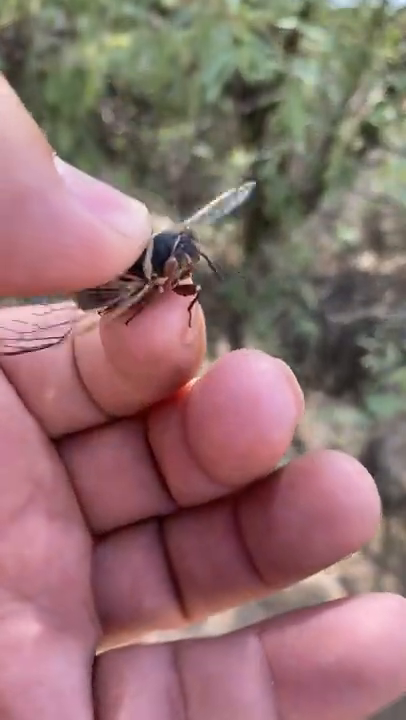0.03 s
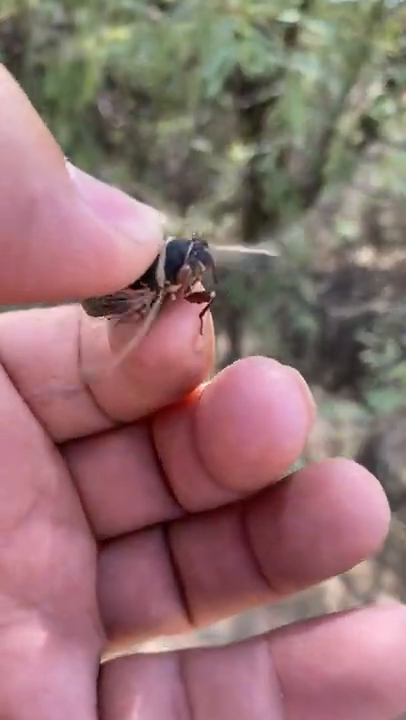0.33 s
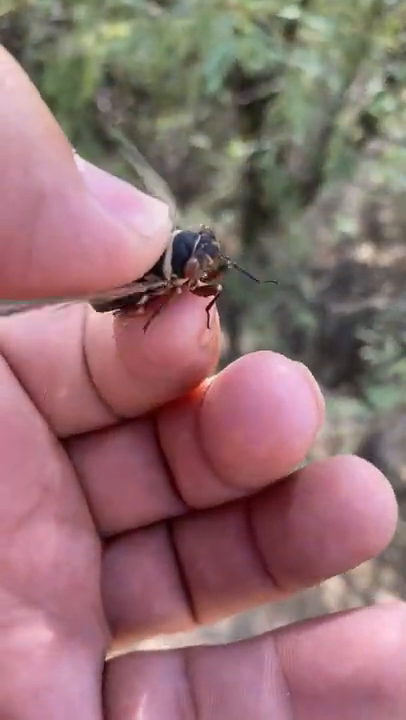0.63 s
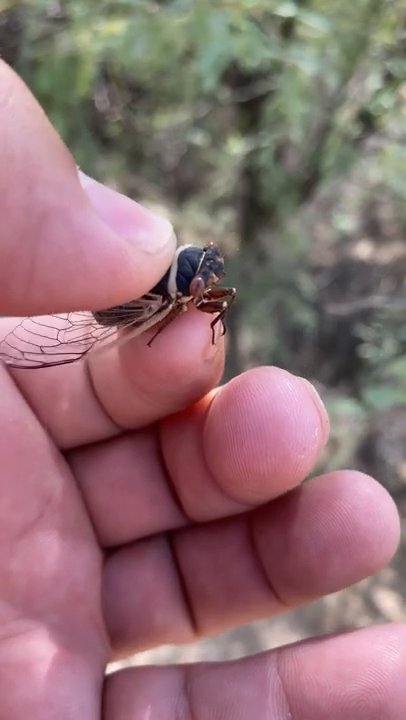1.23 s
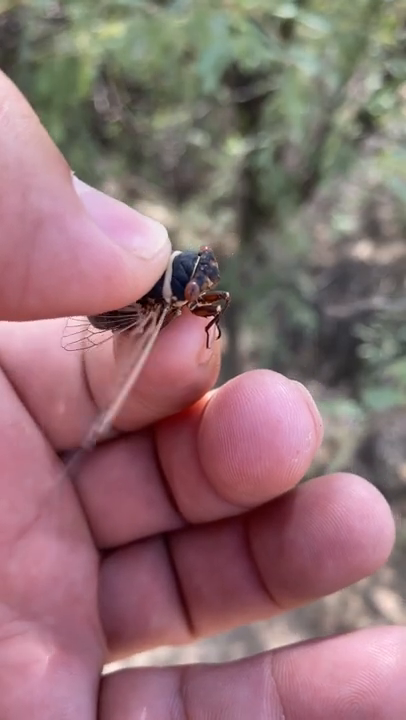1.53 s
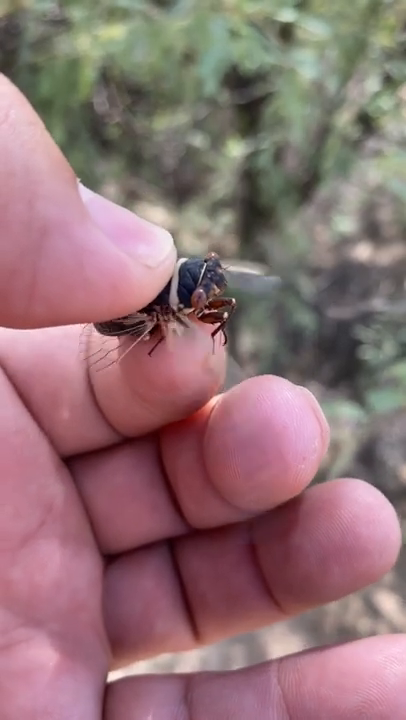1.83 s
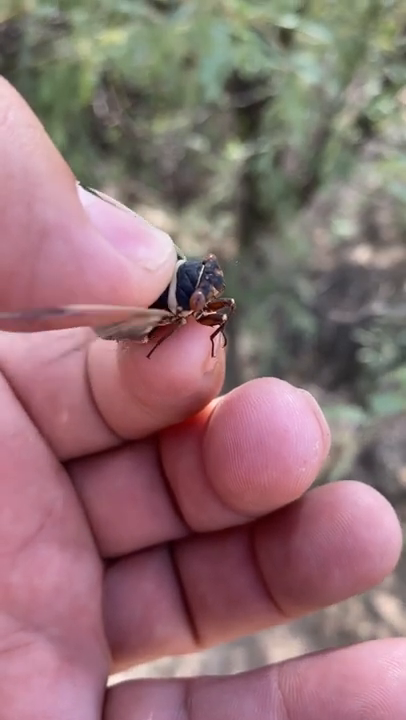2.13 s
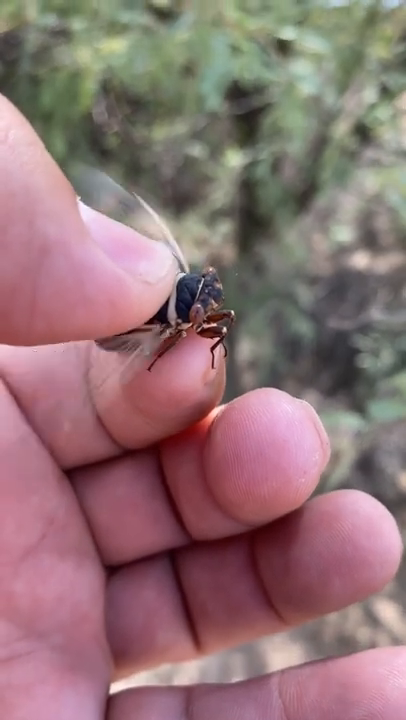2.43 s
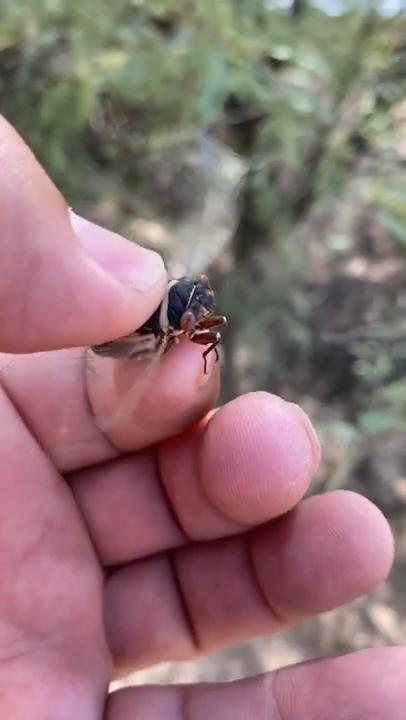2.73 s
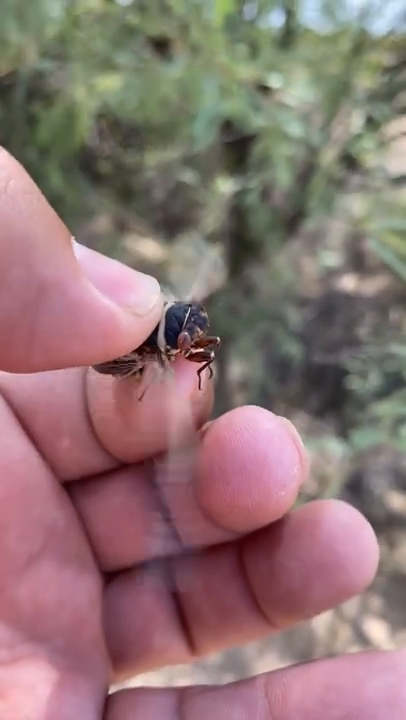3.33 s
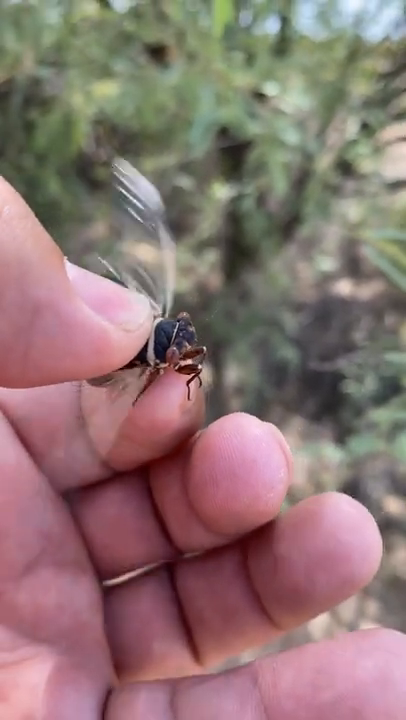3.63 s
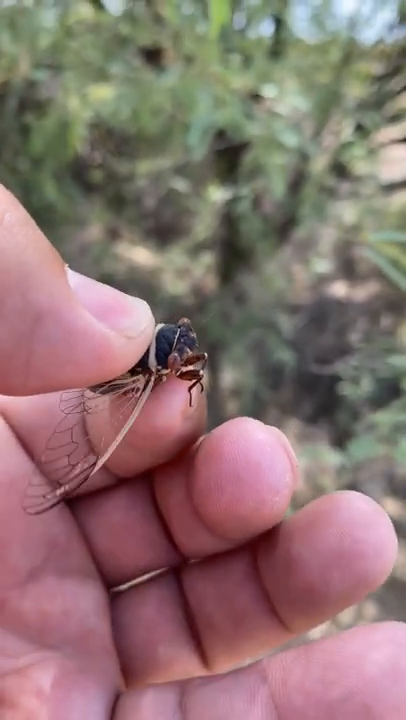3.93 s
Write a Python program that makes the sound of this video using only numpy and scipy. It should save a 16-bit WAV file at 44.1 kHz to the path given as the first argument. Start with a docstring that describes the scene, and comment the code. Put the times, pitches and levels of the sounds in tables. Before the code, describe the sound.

A cicada held between fingers gives short, raspy squawks and flutters its wings in repeated fits close to the microphone. Behind it, outdoors, another cicada sings steadily over a shrill distant chorus and a faint low rumble.

```python
"""A cicada, held between finger and thumb close to the microphone, struggles in short fits.
Its wings thrum the air, slap and brush the fingers, and now and then give a lone twitch.
Its tymbals squawk: their ribs buckle in quick trains of clicks that ring the abdomen.
Behind it a second cicada sings steadily in a bush, over a shrill far chorus and a low outdoor rumble."""
import sys
import numpy as np
from scipy import signal
from scipy.fft import rfft, irfft, next_fast_len
from scipy.io import wavfile

SR = 44100
rng = np.random.default_rng(int(sys.argv[2]) if len(sys.argv) > 2 else 0)


def transcribe(u):
    """Save the signal u as a 16-bit wav file named by the first command-line argument.

    u: samples, shape (n,) or (channels, n), limited to [-1, 1]; the rate is SR.
    q: integer samples, one column per channel.
    """
    v = np.clip(np.atleast_2d(u).T, -1, 1)
    q = np.round(v * 32767).astype(np.int16)
    wavfile.write(sys.argv[1], SR, q)


N = 176400

# Table levels are relative; each layer's rms level is set where it enters stereo().
# Shrill hiss of the far chorus (frequency [Hz], level [dB])
CHORUS_EQ = [(2000, -51), (3300, -25.5), (4600, -24), (5300, -29.5), (6200, -11), (7000, -12.5), (8600, -8),
             (9300, -4), (9700, 0.5), (10500, -2), (11400, -3), (12500, -12.5), (13800, -15), (15000, -29),
             (16000, -22.5)]
# Low outdoor bed (frequency [Hz], level [dB])
RUMBLE_EQ = [(15, -45), (35, -5.5), (55, 6), (90, -2), (135, 2), (180, -5), (260, -5), (350, -3),
             (500, -10), (700, -10), (1000, -15), (1700, -23.5), (2200, -21), (3300, -44), (8000, -51)]
# Pace of the neighbour's tymbals (time [s], rate [cycles/s])
SONG_PACE = [(0, 160.0), (1, 159.8), (2.4, 160.0), (3.1, 159.7), (3.5, 159.0), (4, 159.6)]
# Tone of the neighbour's song (frequency [Hz], level [dB])
SONG_EQ = [(3000, -64), (5300, -30.5), (7000, -15), (8700, -10.5), (9300, 0), (9650, 1), (10400, -2.5),
           (11400, -5), (12500, -9), (14000, -26), (16000, -24)]
# Fits of flapping (start [s], length [s], rate [beats/s], air level [dB], slap level [dB])
WING_FITS = [(.004, .072, 48, 4.5, -12), (0.136, .165, 51.4, 2, -11.5), (0.457, .165, 45, 1, -0.5),
             (0.761, .12, 49.7, 2.5, -1), (1.079, .145, 41, 0.5, -3.5), (1.405, .125, 41.7, -1, -0.5),
             (1.79, .1, 44.4, 2, 3), (2.101, .145, 43, 0.5, -0.5), (2.466, .075, 44.6, -2, -4.5),
             (2.607, .075, 46, -1, -1.5), (2.744, .078, 45.7, 0.5, -2.5), (3.087, .168, 43, -1.5, -1.5),
             (3.345, .08, 43.3, 0.5, -1.5), (3.649, .165, 47.4, -1, -1.5)]
# Thrum of air pushed by the wings (frequency [Hz], level [dB])
AIR_EQ = [(20, -46), (48, 1), (65, 1), (95, -0.5), (150, -9), (250, -7), (350, -14.5), (480, -22),
          (900, -27.5), (2000, -32), (5000, -83)]
# Snap of a wing on a finger (frequency [Hz], level [dB])
SLAP_EQ = [(300, -26), (900, -13), (1700, -14.5), (2100, -6.5), (2400, 3), (2750, -2.5), (3300, -22.5),
           (4500, -8.5), (7000, -9.5), (10000, -8.5), (13000, -4.5), (16000, -10)]
# Wing membranes brushing skin (frequency [Hz], level [dB])
RUSTLE_EQ = [(400, -11), (1500, -11.5), (2450, 4.5), (3200, -4.5), (4500, -1), (10000, -7), (13000, 0),
             (16000, -1.5)]
# Squawks of the held cicada (start [s], length [s], tymbal rate [cycles/s], level [dB])
SQUAWK_CUES = [(0.192, 0.058, 156, -0.5), (.4753, .003, 150, -5), (.4873, 0.044, 150, 0.5),
               (0.537, .003, 150, -6), (0.5568, 0.053, 159, 2), (0.809, 0.045, 151, 1.5),
               (1.0817, 0.0027, 140, 0.5), (1.1017, 0.045, 151, 2.5), (1.4385, 0.077, 144, 1.5),
               (1.893, 0.0032, 260, 0.5), (2.136, .003, 120, -0.5), (2.1475, 0.054, 151, -.5),
               (2.526, .01, 150, -0.5), (2.645, .028, 150, -1), (3.116, 0.039, 144, 1.5),
               (3.17, 0.023, 139, 1), (3.751, .03, 134, 2.5), (3.8142, 0.01, 197, 1),
               (3.9975, .003, 180, 0.5)]
# Ribs that buckle in each tymbal cycle (offset from the main click [s], level [dB])
TYMBAL_RIBS = [(-.0026, -2), (-.0008, -7.5), (0., -1.5)]
# Ring of the abdomen (frequency [Hz], level [dB])
ABDOMEN_EQ = [(1500, -54), (3000, -29), (3500, -26), (4000, -16), (4600, -10.5), (5300, -10.5),
              (6400, -5.5), (7200, 1.5), (7800, -9), (8400, -6.5), (9000, -12.5), (9600, -9.5),
              (10800, -18), (13000, -7), (14300, -12.5), (15700, -22.5)]
# Lone twitches of the wings (time [s], level [dB])
TWITCH_CUES = [(.38, -3.5), (.68, -3.5), (.985, -3), (1.58, -14.5), (2.332, -13.5), (2.391, -4.5),
               (3.975, -8.5)]
# Phase between the two microphone ports (frequency [Hz], left lead [rad])
STEREO_PHASE = [(20, 0), (380, 0.43), (680, 2), (1400, 0.65), (2000, 1.06), (2500, 2.2), (3700, 0.71),
                (5500, 1), (7000, 3), (8000, 3), (9900, 6), (11300, 6.5), (12800, 9), (14800, 9.5),
                (15600, 13.5)]
# Balance between the ports (frequency [Hz], left minus right [dB])
STEREO_BALANCE = [(80, -.5), (420, -5), (950, 3.5), (1600, 4), (2250, -4), (3000, 0), (4500, -3.5),
                  (5600, 0), (6500, 0.5), (16000, 0)]
# How alike the ports sound (frequency [Hz], likeness [0-1])
STEREO_LIKENESS = [(60, 1), (300, .96), (600, 0.82), (1700, .65), (2700, 0.86), (5500, 0.71), (7200, 1),
                   (8800, 0.71), (10300, 1), (11800, .75), (13300, 1), (16000, 0.72)]

TOP_HZ = 15880


def amp(db):
    """Decibels to gain."""
    return 10 ** (np.asarray(db) / 20)


def unit(x):
    """Scales to rms 1."""
    return x / np.sqrt(np.mean(x ** 2) + 1e-20)


def curve(points, hz):
    """Reads a table on a log-frequency axis."""
    f, value = np.transpose(points)
    return np.interp(np.log(hz + 1), np.log(f + 1), value)


def clicks(times, db):
    """Sharp impulses at exact times, even between samples."""
    out, at = np.zeros(N), np.asarray(times)[:, None] * SR
    near = np.floor(at).astype(int) + np.arange(-8, 9)
    shape = np.sinc(near - at) * np.cos(np.pi * (near - at) / 18) ** 2
    inside = (near >= 0) & (near < N)
    np.add.at(out, near[inside], (shape * amp(db)[:, None])[inside])
    return out


def colour(x, eq, size=8192):
    """Minimum-phase EQ: the ring follows the hit."""
    log_gain = np.log(amp(curve(eq, abs(np.fft.fftfreq(size, 1 / SR)))))
    ring = np.fft.ifft(np.exp(np.conj(signal.hilbert(log_gain)))).real[:size // 2]
    return signal.oaconvolve(x, ring[None], axes=1)[:, :N]


def smear(x, lag_s):
    """Highs arrive ahead of lows, so a click becomes a tiny chirp."""
    hz = np.fft.rfftfreq(2 * N, 1 / SR)
    delay = lag_s * (.5 - hz / TOP_HZ)
    return irfft(rfft(x, 2 * N) * np.exp(-2j * np.pi * np.cumsum(delay) * hz[1]))[:N]


def linger(hits, decay_s):
    """Envelope that spreads each hit's energy over a decay."""
    pole = np.exp(-2 / (decay_s * SR))
    return np.sqrt(signal.lfilter([1 - pole], [1, -pole], hits ** 2 + 1e-20))


def noise():
    """Two unrelated rows of white noise."""
    return rng.standard_normal((2, N))


def spray(hits, decay_s):
    """Two unrelated puffs of noise after each hit, with the hit's energy."""
    return linger(hits, decay_s) * noise()


def scattered(hits, share, decay_s):
    """Mid: the hits with a noisy tail. Side: tail alone."""
    mid, side = spray(hits, decay_s)
    return np.array([unit(hits + share * mid), unit(side)])


def stereo(pair, eq, db):
    """Colours a mid/side pair and spreads it over the two microphone ports at an rms level."""
    size = next_fast_len(N + 4096)
    hz = np.fft.rfftfreq(size, 1 / SR)
    mid, side = rfft(colour(pair, eq), size)
    likeness = np.clip(curve(STEREO_LIKENESS, hz), 0, .995)
    mid, side = mid * np.sqrt(1 + likeness), side * np.sqrt(1 - likeness)
    pan = amp(curve(STEREO_BALANCE, hz) / 2)
    left = (mid + side) * pan
    right = (mid - side) / pan * np.exp(-1j * curve(STEREO_PHASE, hz))
    return amp(db) * unit(irfft(np.array([left, right]), size)[:, :N])


def waver(depth_db, count=24):
    """A slow random ride on the fader."""
    hz, t = np.geomspace(.5, 14, count)[:, None], np.linspace(0, N / SR, count * count)
    wobbles = np.sin(2 * np.pi * (hz * t + rng.random((count, 1)))) / hz ** 0.24
    return amp(depth_db * np.interp(np.arange(N) / SR, t, unit(wobbles.sum(0))))


def far_chorus():
    """Distant cicadas merge into one shrill, shimmering hiss."""
    return stereo(noise(), CHORUS_EQ, db=-38) * waver(depth_db=0.9)


def outdoor_rumble():
    """A low bed of noise that swells and sinks."""
    return stereo(noise(), RUMBLE_EQ, db=-45) * waver(depth_db=2.4)


def neighbour_song(jitter_s=.00002, spread_db=1.36, gap_s=.00205, echo_s=.008, echo_mix=0.28):
    """A steady train of double tymbal clicks, with echoes from the ground and twigs."""
    t = np.arange(N) / SR
    cycles = np.cumsum(np.interp(t, *np.transpose(SONG_PACE))) / SR
    beats = np.interp(np.arange(1, cycles[-1]), cycles, t)
    late, late2, loud, loud2 = rng.standard_normal((len(beats), 4)).T
    song = clicks(beats + jitter_s * late, spread_db * loud)
    song += clicks(beats + gap_s + jitter_s * late2, spread_db * loud2 - 8)  # softer second click
    lag = np.arange(SR // 24) / SR
    paths = rng.standard_normal((2, len(lag))) * np.exp(-lag / echo_s)
    echo_mid, echo_side = signal.oaconvolve(song[None], paths, axes=1)[:, :N]
    mid = unit(unit(song) + echo_mix * unit(echo_mid))
    return stereo(np.array([mid, unit(echo_side)]), SONG_EQ, db=-36)


def wing_fits(air_lag_s=0.004035, jitter_s=.0005, growth_db=2.5, spread_db=.8, crinkles_per_s=1500):
    """Every wingbeat pushes air down and up, slaps the fingers and brushes the skin."""
    air, slaps = np.zeros(N), np.zeros(N)
    for start, length, rate, air_db, slap_db in WING_FITS:
        t = np.arange(0, length, 1 / rate)
        arch_db = -4.5 * np.linspace(-1, 1, len(t)) ** 2  # softer at both ends of the fit
        downstrokes = start + t + air_lag_s
        air += clicks(downstrokes + jitter_s * rng.standard_normal(len(t)), air_db + arch_db)
        air += clicks(downstrokes + .45 / rate, air_db + arch_db - 8)  # weaker upstrokes
        force_db = slap_db + .3 * arch_db + growth_db * (t / length - .5)  # slaps harden as it goes
        slaps += clicks(start + t, force_db + spread_db * rng.standard_normal(len(t)))
    swirl = scattered(-air, share=0.66, decay_s=0.01)
    thrum = stereo(swirl, AIR_EQ, db=-41)
    softened = linger(slaps, decay_s=.0009)  # rounds the slap's attack
    slap = stereo(spray(softened, decay_s=.0012), SLAP_EQ, db=-42.5)
    crinkles = (rng.random(N) < crinkles_per_s / SR) * linger(slaps, decay_s=.008)
    rustle = stereo(spray(crinkles, decay_s=.0009), RUSTLE_EQ, db=-44)
    return thrum + slap + rustle


def tymbal_squawks(lead_in_db=-11, shift_s=0.0002406, jitter_s=.00002, spread_db=1.54):
    """Each tymbal cycle buckles a few ribs, and each click rings the abdomen."""
    times, levels = [], []
    for start, length, rate, db in SQUAWK_CUES:
        t = np.arange(-1 / rate, length, 1 / rate)
        effort_db = db + np.where(t < -.5 / rate, lead_in_db, 0)  # one weak cycle leads in
        for offset, rib_db in TYMBAL_RIBS:
            late, loud = rng.standard_normal((len(t), 2)).T
            rib_lag = offset + shift_s * rng.standard_normal()  # held for the whole squawk
            times.extend(start + t + rib_lag + jitter_s * late)
            levels.extend(effort_db + rib_db + spread_db * loud)
    chirps = smear(clicks(times, levels), lag_s=.0007)
    in_hand = scattered(chirps, share=1, decay_s=.0014)  # reflections in the hand
    return stereo(in_hand, ABDOMEN_EQ, db=-27.5)


def wing_twitches(width_s=0.0096):
    """Single shrugs of the wings, each a soft puff and a light brush."""
    t = np.arange(N) / SR
    swell = sum(amp(db) * np.exp(-.5 * ((t - at) / width_s) ** 2) for at, db in TWITCH_CUES)
    puff = stereo(noise(), AIR_EQ, db=-35)
    brush = stereo(noise(), RUSTLE_EQ, db=-43)
    return swell * (puff + brush)


def scene():
    """The held insect up front, the singing bushes behind."""
    held = tymbal_squawks() + wing_fits() + wing_twitches()
    return held + neighbour_song() + far_chorus() + outdoor_rumble()


def record(dry):
    """The recorder's band limit: a steep cut of the very top."""
    low_pass = signal.firwin(401, TOP_HZ, window=("kaiser", 8), fs=SR)
    return signal.oaconvolve(dry, low_pass[None], "same")


dry = scene()
out = record(dry)
transcribe(out)
```